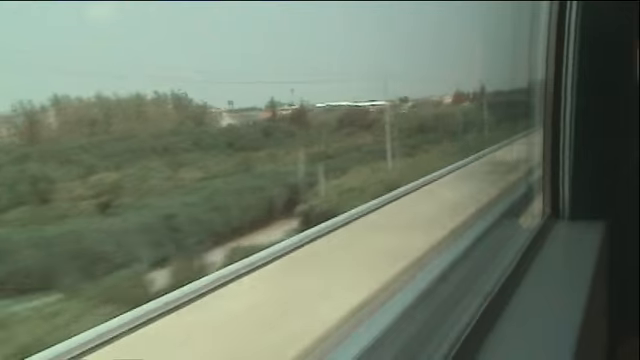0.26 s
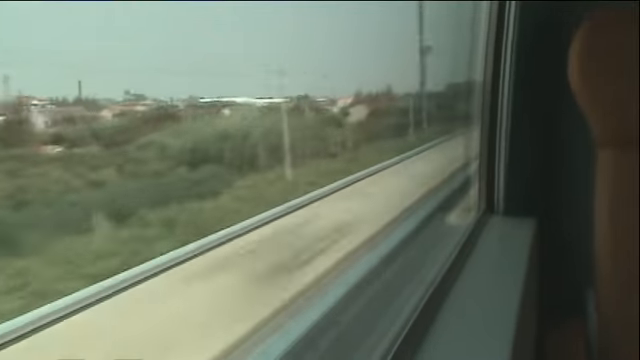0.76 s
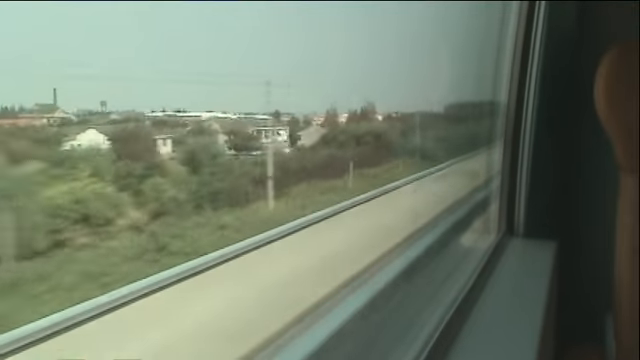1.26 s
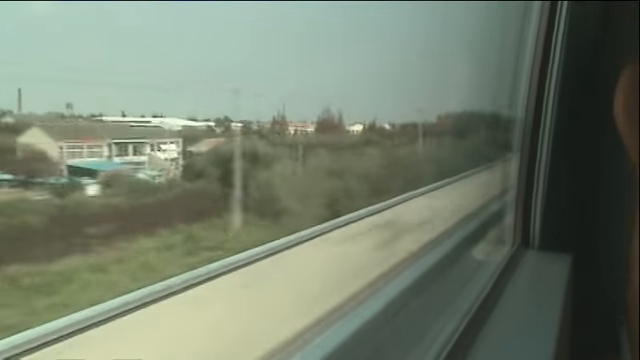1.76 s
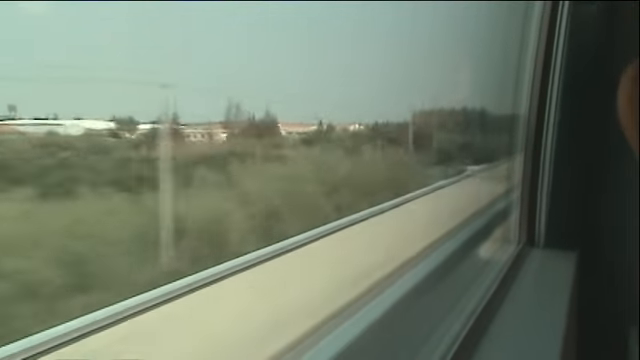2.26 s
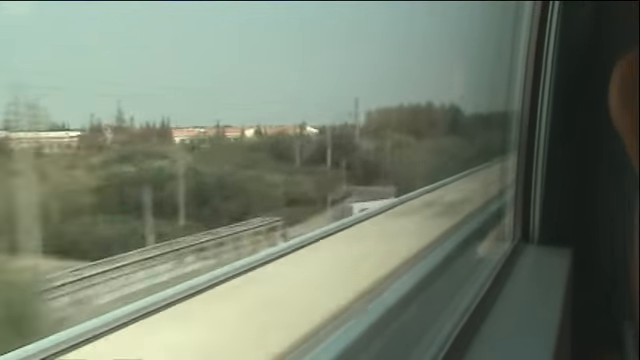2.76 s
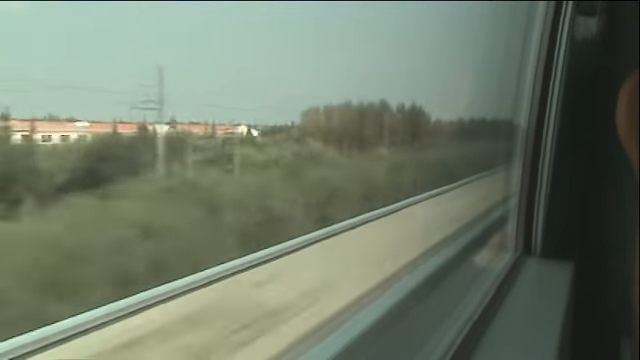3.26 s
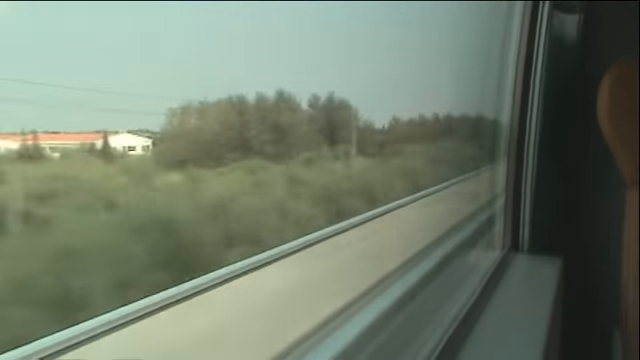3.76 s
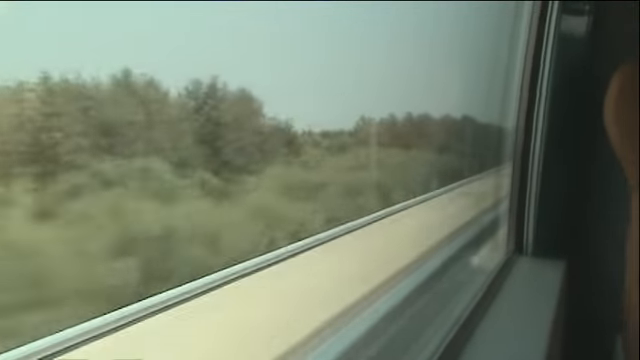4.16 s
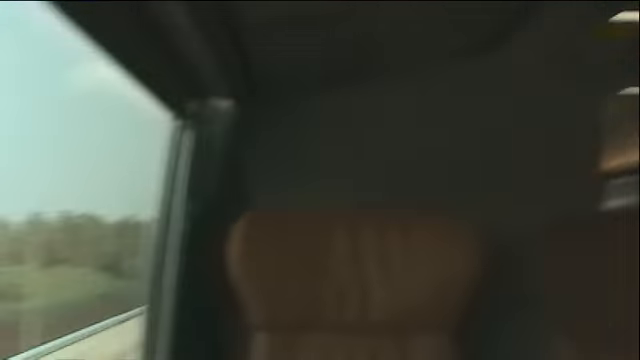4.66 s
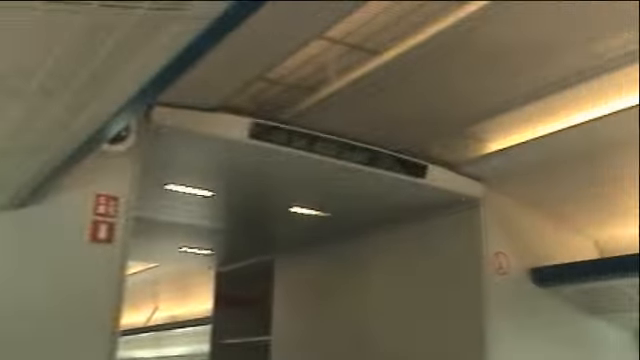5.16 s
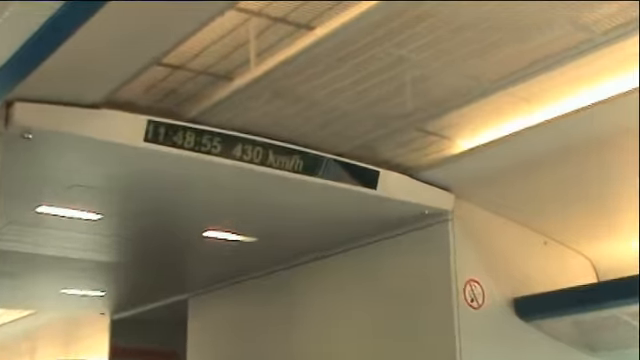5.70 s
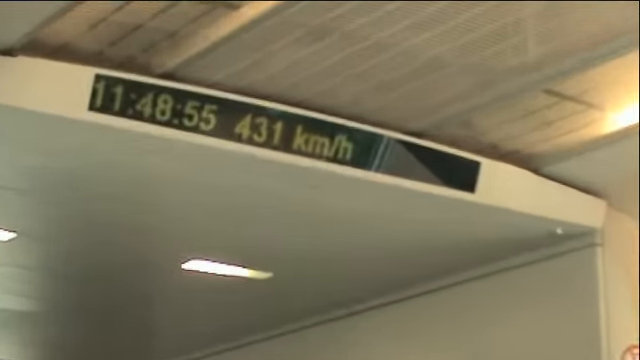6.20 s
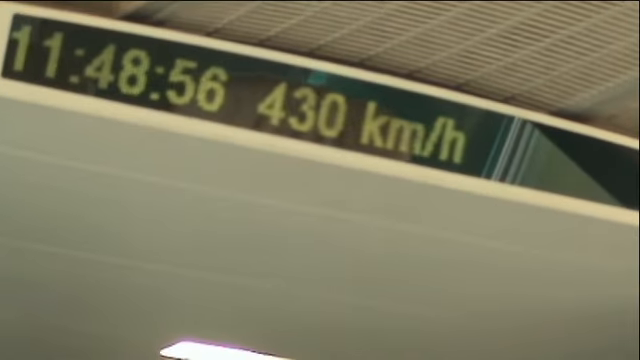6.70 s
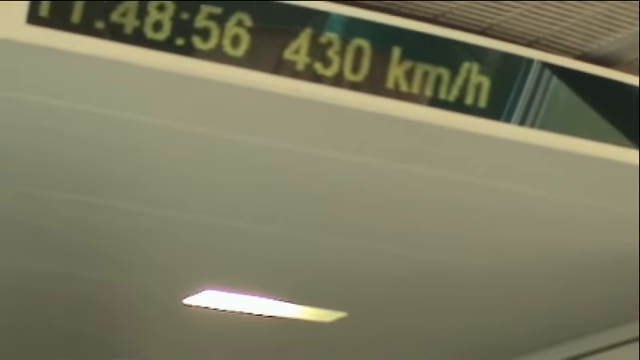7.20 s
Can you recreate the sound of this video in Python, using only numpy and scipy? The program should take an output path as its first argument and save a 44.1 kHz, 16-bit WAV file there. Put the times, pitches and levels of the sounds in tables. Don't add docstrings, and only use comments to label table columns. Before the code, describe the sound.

A loud, bass-heavy roar of air fills a high-speed train cabin from start to finish. Near the window the pane adds a hollow low boom and ring, strongest around the middle, then it drops away as the microphone swings inside. Faint steady whistles of fans and airflow sit behind. The hand-held microphone overloads: the level pumps, peaks flatten, and dull pops scatter throughout.

```python
import sys
import numpy as np
from scipy import signal
from scipy.fft import rfft, irfft
from scipy.io import wavfile

SR = 44100
rng = np.random.default_rng(int(sys.argv[2]) if len(sys.argv) > 2 else 0)


def undo_db(level):
    steps = np.asarray(level, float) / 20
    return 10 ** steps


def store_pcm(level_fs):
    pcm = np.round(np.clip(level_fs, -1, 1) * 32767).astype(np.int16)
    wavfile.write(sys.argv[1], SR, np.atleast_2d(pcm).T)


N = 328104

# frequency_hz, density_db
ROAR_SPECTRUM = [(20, -20), (32, -21), (50, 6), (78, 1.5), (105, 10), (120, 7), (150, 5), (200, -16.5),
                 (300, -46), (3000, -140)]
# frequency_hz, density_db
BOOM_SPECTRUM = [(20, -70), (110, -26.5), (170, -1), (230, 0), (275, -3.5), (320, -9.5), (400, -31),
                 (600, -54.5), (4000, -140)]
# frequency_hz, density_db
RUSH_SPECTRUM = [(40, -58.5), (300, -1), (450, -7.5), (620, -8.5), (850, -14.5), (1500, -20), (2200, -26),
                 (3000, -32), (4000, -37), (5300, -43.5), (6000, -46), (8500, -55), (11000, -67.5),
                 (15000, -88)]
# multiple_of_section_rate, level_db (rms)
TRACK_TONES = [(3, -26), (4, -33), (6, -31), (7, -38), (10, -43), (11, -40), (12, -47), (13, -43),
               (14, -42), (15, -50), (16, -40), (17, -47), (18, -43), (19, -55), (20, -55), (21, -54),
               (22, -55), (23, -54), (24, -47), (26, -57), (27, -52), (30, -50), (35, -55), (36, -50),
               (37, -59)]
PANE_MULTIPLES = (6, 16, 18)
# frequency_hz, left_lead_rad, left_over_right_db, likeness_0_to_1
MICROPHONE_PORTS = [(45, .93, 2.3, .96), (100, .9, 3.7, .995), (200, 1.15, 3.3, .975),
                    (370, 1.51, 2.1, .92), (700, 1.33, 1.7, .9), (1150, 1.29, 2.3, .9),
                    (2000, .78, 2.3, .85), (3300, .41, 3.5, .79), (5000, .12, 2.3, .77), (8000, 0, .7, .87),
                    (11000, 0, .4, .87)]
# start_s, peak_db, polarity
STRONG_POPS = [(0.1646, 2.1, 1), (0.3262, -3.5, -1), (1.9446, -0.9, -1), (2.202, -2.9, 1),
               (2.7997, -3.1, -1), (2.8292, -7, 1), (3.0044, 0.9, 1), (3.0577, -1.9, -1), (3.2333, -0.2, 1),
               (3.7903, -1.2, 1), (4.85, 2.5, -1)]
# start_s, peak_db
FINGER_TICKS = [
    (6.762, -29.5),
]
# start_s, nearness_to_pane_0_to_1, aim_down_aisle_0_to_1
CAMERA_PATH = [
    (0, .4, 0.04),
    (.7, 0.67, 0),
    (2.8, 0.77, 0),
    (3.6, 1.01, 0.01),
    (4.55, 0.8, 0),
    (4.78, 0, .05),
    (5.5, .05, .1),
    (6.1, .05, 0.96),
    (7.44, .05, 0.96),
]
# start_s, level_db (about the mean)
BUFFETING = [(0, -1.5), (.6, 2.5), (1.2, -0.7), (2.8, 1.3), (3.6, -0.6), (4.2, 0.4), (4.6, -1.5), (4.8, 1),
             (5.5, 1.1), (6.2, -2.2), (7.44, 0.1)]
# start_s, pitch_hz
SEAL_PITCH = [(0, 3276), (2, 3407), (4.4, 3360), (4.9, 3307), (7.44, 3410)]


def rms_one(x):
    return x / np.sqrt(np.mean(x ** 2) + 1e-20)


def in_time(rows):
    s, *columns = np.transpose(rows)
    return [np.interp(np.arange(N) / SR, s, c) for c in columns]


def over_hz(rows):
    hz, *columns = np.transpose(rows)
    bins = np.log(np.fft.rfftfreq(N, 1 / SR) + 1)
    return [np.interp(bins, np.log(hz), c) for c in columns]


def drift(rate_hz):
    r = np.exp(-80 * np.pi * rate_hz / SR)
    noise = rng.standard_normal(N // 40 + 2002)
    slow = signal.lfilter([1], [1, -2 * r, r * r], noise)[2000:]
    return np.interp(np.arange(N) / 40, np.arange(len(slow)), rms_one(slow))


def whistle(pitch_hz, level_db, width_hz, flutter_db):
    lowpass = signal.butter(2, width_hz / 2, fs=SR, output="sos")
    wobble = signal.sosfilt(lowpass, rng.standard_normal((2, 2, N)))
    phase = 2 * np.pi * np.cumsum(pitch_hz) / SR
    tone = wobble[0] * np.cos(phase) + wobble[1] * np.sin(phase)
    return rms_one(tone) * undo_db(level_db + flutter_db * drift(4.0))


def turbulence(spectrum, level_db, flutter_db):
    (density_db,) = over_hz(spectrum)
    fields = irfft(rfft(rng.standard_normal((2, N))) * undo_db(density_db), N)
    return rms_one(fields) * undo_db(level_db + flutter_db * drift(12))


def finger_tick():
    t60_s, dulling = .016, .95
    band = signal.butter(4, [3000, 11000], "band", fs=SR, output="sos")
    out = np.zeros((2, N))
    for start_s, peak_db in FINGER_TICKS:
        age_s = np.arange(600) / SR
        burst = rng.standard_normal(600) * undo_db(peak_db + 6 - 60 * age_s / t60_s)
        burst = signal.lfilter([.3], [1, -dulling], burst)
        out[0, round(start_s * SR):][:600] = signal.sosfilt(band, burst)
    return out


def ceiling_vent():
    return whistle(np.full(N, 5120), level_db=-65, width_hz=500, flutter_db=2.5)


def cabin_fans(aisle):
    high = whistle(np.full(N, 2916), -61 - 7 * aisle, width_hz=14, flutter_db=.5)
    low = whistle(1150 + 45 * aisle, -42.5, width_hz=16, flutter_db=.5)
    down_aisle = whistle(np.full(N, 1265), -51.5 + 9.5 * aisle, width_hz=17, flutter_db=.5)
    return high + low + down_aisle


def window_seal(pane, aisle):
    (pitch_hz,) = in_time(SEAL_PITCH)
    return whistle(pitch_hz, -55 + 6.5 * pane + 1.5 * aisle, width_hz=220, flutter_db=1.1)


def air_duct(pane, aisle):
    return whistle(1194 + 29.74 * aisle, -36 - 3.5 * pane, width_hz=177, flutter_db=1.6)


def track_hum(pane, level_db, waver_db, wander_rad):
    sections_per_s = 38.66
    pane_loss_db = -7 * (2 - pane)
    turn = 2 * np.pi * sections_per_s * np.arange(N) / SR
    tones = np.zeros(N)
    for multiple, tone_db in TRACK_TONES:
        strength_db = tone_db + waver_db * drift(1.1) + (multiple in PANE_MULTIPLES) * pane_loss_db
        phase = rng.uniform(0, 2 * np.pi) + wander_rad * drift(1.72)
        tones += undo_db(strength_db) * np.sin(multiple * turn + phase)
    return np.sqrt(2) * undo_db(level_db) * tones * [[1], [0]]


def window_pane(pane):
    boom = turbulence(BOOM_SPECTRUM, -23.5 + 6 * pane, flutter_db=.5)
    ring = whistle(np.full(N, 243), -38 + 14 * pane, width_hz=37.6, flutter_db=.1)
    return boom + ring


def air_rush(buffet_db):
    return turbulence(RUSH_SPECTRUM, -25 + 0.13 * buffet_db, flutter_db=.3)


def hull_roar(buffet_db):
    return turbulence(ROAR_SPECTRUM, -14.5 + buffet_db, flutter_db=.5)


def microphone_pair(fields):
    lead_rad, left_db, alike = over_hz(MICROPHONE_PORTS)
    alike = np.clip(alike, 0, 1)
    left_gain, right_gain = undo_db(left_db / 2), undo_db(-left_db / 2)
    delay = np.exp(-1j * lead_rad)
    direct, diffuse = rfft(fields)
    right = (alike * direct + np.sqrt(1 - alike ** 2) * diffuse) * delay * right_gain
    pair = np.array([direct * left_gain, right])
    middle = np.abs(left_gain + alike * delay * right_gain) / 2
    return irfft(pair / middle, N)


def scene():
    pane, aisle = in_time(CAMERA_PATH)
    (buffet_db,) = in_time(BUFFETING)
    air = finger_tick() + ceiling_vent() + cabin_fans(aisle)
    air = air + window_seal(pane, aisle) + air_duct(pane, aisle)
    air = air + track_hum(pane, level_db=-.3, waver_db=2.2, wander_rad=1.5)
    air = air + window_pane(pane) + air_rush(buffet_db) + hull_roar(buffet_db)
    return microphone_pair(air)


def random_kicks(per_s, level_db, spread_db):
    hits = rng.random(N) < per_s / SR
    return hits * undo_db(level_db + spread_db * rng.standard_normal(N)) * rng.choice([-1, 1], N)


def widening_pops(width_s, small_per_s, small_db):
    pane = in_time(CAMERA_PATH)[0]
    kicks = random_kicks(small_per_s, small_db, 1.8)
    kicks += random_kicks(2 + 2 * pane, -6.5, 1.6)
    for start_s, peak_db, polarity in STRONG_POPS:
        kicks[round(start_s * SR)] = undo_db(peak_db) * polarity
    u = np.arange(-300, 301) / SR / width_s
    bump = np.exp(-u ** 2 / 2) - .4 * np.exp(-u ** 2 / 12)
    return signal.fftconvolve(kicks, bump / bump.max(), "same") * [[-.5], [.75]]


def low_pass(x):
    return signal.sosfilt(signal.butter(12, 13500, fs=SR, output="sos"), x)


def record(dry):
    fall_db = 97.0 * np.arange(N) / SR
    level_db = 20 * np.log10(np.abs(dry).max(axis=0) + 1e-9)
    held_db = np.maximum.accumulate(level_db + fall_db) - fall_db
    over_db = np.maximum(held_db + 5.5, 0)
    r = np.exp(-1 / (0.001 * SR))
    duck_db = 0.61 * signal.lfilter([1 - r], [1, -r], over_db)
    wet = dry * undo_db(3.5 - duck_db) + widening_pops(width_s=.0004, small_per_s=25, small_db=-21)
    rounded = wet / (1 + (wet / 1.065) ** 8) ** (1 / 8)
    return low_pass(rounded)


dry = scene()
out = record(dry)
store_pcm(out)
```